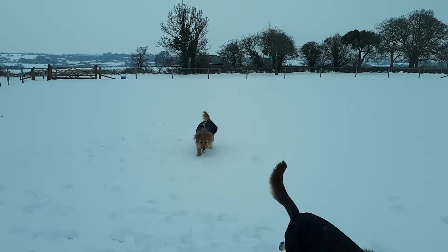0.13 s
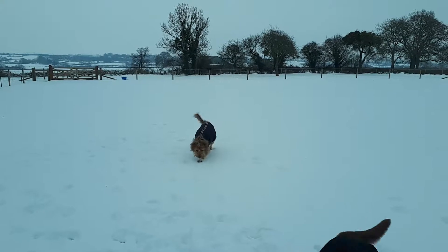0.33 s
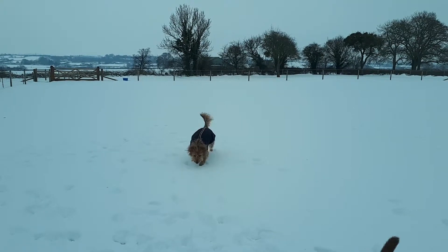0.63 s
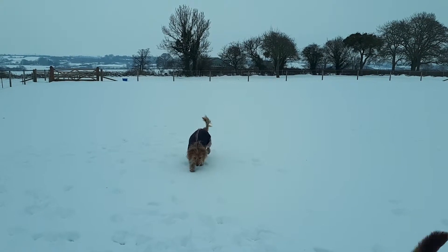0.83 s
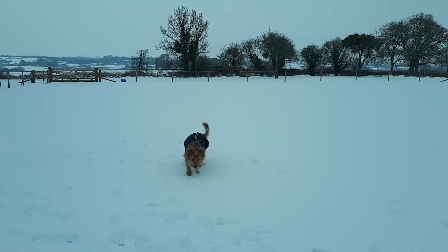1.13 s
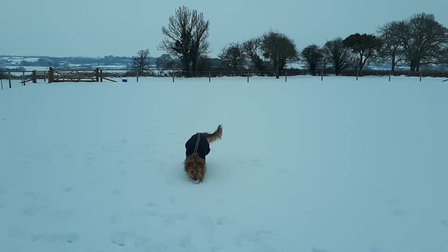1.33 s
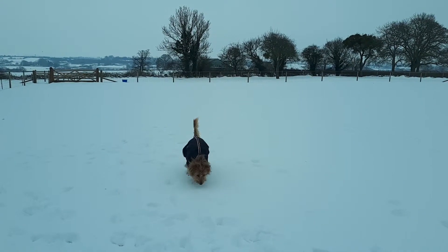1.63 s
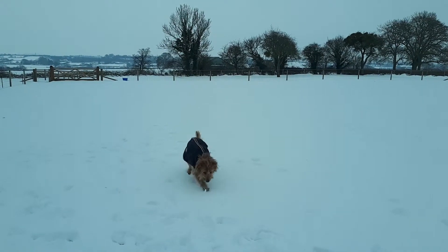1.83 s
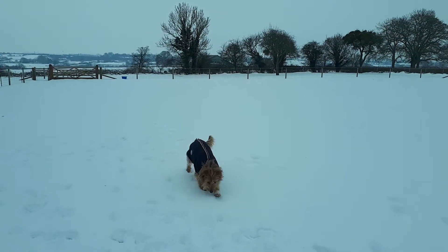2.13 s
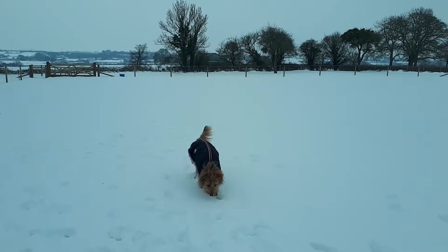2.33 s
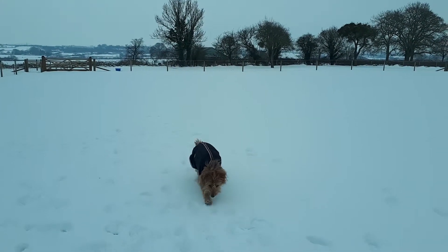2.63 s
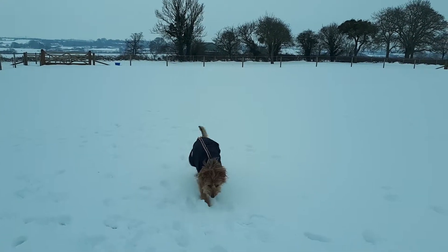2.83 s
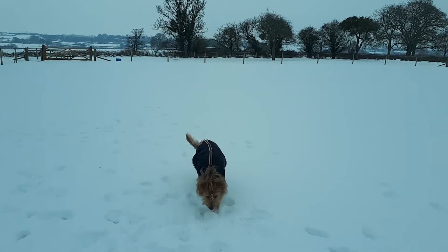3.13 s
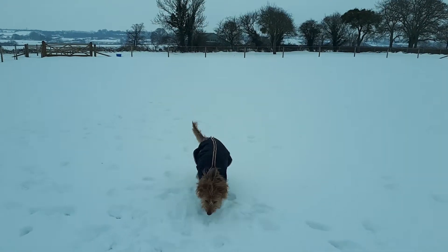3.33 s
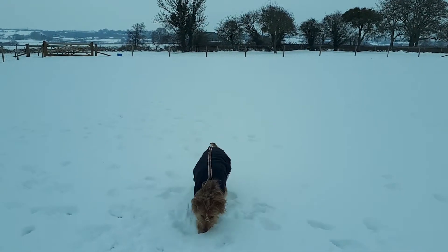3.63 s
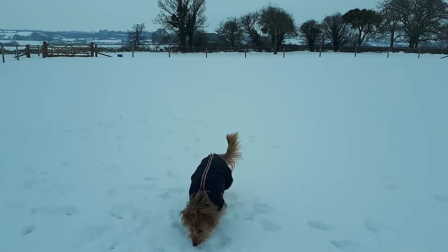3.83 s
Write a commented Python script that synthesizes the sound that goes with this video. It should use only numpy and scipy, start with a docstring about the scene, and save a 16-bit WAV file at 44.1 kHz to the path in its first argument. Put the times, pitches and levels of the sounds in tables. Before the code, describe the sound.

Close, dry crunching of dogs trotting on icy snow, brittle cracks between steps, soft distant air beneath; after nearly three seconds wind buffets and knocks the microphone, mostly on the left, far louder than the paws.

```python
"""In an open field of crusted snow, dogs walk close to a hand-held stereo microphone.
Each paw sets off a shower of tiny random ticks, filtered into thud, crush, rasp, ice and powder.
Single plates of ice snap as damped rings, and loose crumbs tick between the steps.
Late on, filtered noise and short knocks make wind that rumbles, buffets and slaps the two ports
until a limiter turns it down; a soft wash of far air lies underneath."""
import sys
import numpy as np
from scipy import signal
from scipy.fft import rfft, irfft
from scipy.io import wavfile
from scipy.ndimage import uniform_filter1d, minimum_filter1d

SR = 44100
rng = np.random.default_rng(int(sys.argv[2]) if len(sys.argv) > 2 else 0)


def generate_wav(sig):
    """Save sig (samples, or channels by samples) to the path in sys.argv[1] as 16-bit PCM at SR."""
    pcm = np.round(np.clip(np.atleast_2d(sig).T, -1, 1) * 32767).astype(np.int16)
    wavfile.write(sys.argv[1], SR, pcm)


N = 176400
TIME = np.arange(N) / SR

# The paws are nearer the right port: head start there, its random spread, and left-port gain
RIGHT_LEAD_S, LEAD_SCATTER_S, LEFT_GAIN_DB = 0.00028, 0.00004, -0.54

# Paws pressing into the snow: [t/s, length/s, then level/dB of thud, crush, rasp, ice, powder],
# the levels before a common 1 dB cut
PAW_STEPS = [(0.075, 0.022, -40, -39.5, -57, -41, -40.5), (0.105, 0.053, -43, -44, -51.5, -45, -47.5),
             (0.369, 0.095, -41, -38.5, -42, -39, -49), (0.484, 0.057, -48.5, -45.5, -63, -50.5, -55.5),
             (0.716, 0.02, -34, -46.5, -45.5, -52, -51), (0.747, 0.07, -50, -42, -38, -48, -45.5),
             (0.826, 0.066, -40.5, -52, -49.5, -49.5, -57), (0.942, 0.055, -47.5, -48.5, -55, -54, -65),
             (1.103, 0.074, -66, -44, -56, -48, -59), (1.2, 0.22, -50.5, -51.5, -53, -58, -61.5),
             (1.59, 0.083, -44.5, -44, -47.5, -51, -59.5), (1.722, 0.04, -42, -49.5, -48, -56, -55),
             (1.757, 0.097, -77, -46, -42, -48, -54.5), (1.996, 0.055, -52, -49, -50, -45, -53),
             (2.043, 0.053, -45, -46, -56, -64, -61), (2.515, 0.21, -45, -51, -70, -70, -69.5)]
# Tone of a fracture in each part of the snow, in the order of the level columns above:
# one list per part, each of [f/Hz, relative level/dB]
SNOW_PARTS = [
    [(70, -10), (125, 0.5), (220, -13.5), (380, -7), (700, -30), (2000, -85)],
    [(150, -10.5), (420, 4), (750, 4.5), (1300, 2.5), (2000, 0.5), (4000, -52)],
    [(1200, -3.5), (2300, 1.5), (3100, 2), (3900, -2), (6000, -20)],
    [(2500, -48), (4700, 3.5), (5800, -4), (7300, 3), (8400, -8), (15000, -32)],
    [(6000, -41), (9000, -6), (12000, 4.5), (15500, -1)],
]
FRACTURES_PER_S, SIZE_SPREAD_DB = 2600, 4.5
CLUMP_DB, CLUMP_RATE_HZ = 3, 187   # depth and speed of the wander that bunches fractures


def paws():
    """Snow under a paw breaks in one clumped stream of fractures, heard in all parts of the snow."""
    born = rng.random(N) < FRACTURES_PER_S / SR
    clumps = rms_one(from_db(CLUMP_DB * drift(CLUMP_RATE_HZ)))
    presses = np.array([press(start, length, thud_db, rasp_db)
                        for start, length, thud_db, _, rasp_db, *_ in PAW_STEPS])
    out = 0
    for spectrum, levels_db in zip(SNOW_PARTS, np.transpose(PAW_STEPS)[2:]):
        crackle = even(fractures(born, SIZE_SPREAD_DB, spectrum) * clumps, 0.0277)
        pressure = from_db(levels_db - 1) @ presses   # all steps added together
        out = out + crackle * pressure
    return signal.sosfilt(signal.butter(2, 50, "high", fs=SR, output="sos"), out)


ATTACK_S, RELEASE_S, SAG_DB = 0.0013, 0.0078, 4   # shortest rise, fall, loss during the hold
BITE_SHARE, BITE_S = 0.47, 0.015   # extra force as a paw first breaks through


def press(start, length, thud_db, rasp_db):
    """A paw that lands hard bites at once; one that mostly slides swells slowly."""
    slowdown = from_db(2 * max(rasp_db - thud_db, 0))
    rise = min(ATTACK_S * slowdown, length / 2)
    bite = 1 + BITE_SHARE * np.exp(-np.abs(TIME - start) / BITE_S)
    return bite * envelope(start, length, rise, RELEASE_S, SAG_DB)


GRAIN_Q = 3.17   # how briefly a single fracture rings
PATCHY_DB = 4.5   # fractures of each pitch come and go on their own


def fractures(born, spread_db, spectrum):
    """Each tick has its own size and one of ten pitches, and reaches the right port a little early."""
    at = np.flatnonzero(born)
    loudness = from_db(spread_db * np.minimum(rng.exponential(1, N), 4))
    size = (loudness * rng.choice([-1, 1], N))[at]   # push or pull at random
    lag_s = RIGHT_LEAD_S + LEAD_SCATTER_S * rng.standard_normal(N)[at]
    lag = np.rint(SR * lag_s).astype(int)
    pitch_number = rng.integers(0, 10, N)[at]
    out = 0
    for k, hz in enumerate(np.geomspace(spectrum[0][0], spectrum[-1][0], 10)):
        chosen = size * (pitch_number == k)
        clicks = np.array([np.bincount(port % N, chosen, N) for port in (at + lag, at)])
        b, a = signal.iirpeak(hz, GRAIN_Q, fs=SR)
        rings = signal.lfilter(b, a, clicks + 1e-18)
        out = out + from_db(PATCHY_DB * drift(CLUMP_RATE_HZ / 2)) * rings
    return colour(out, spectrum)


# Single plates of crust snapping: [t/s, peak level/dB before the crust's scatter, f/Hz]
ICE_SNAPS = [(.122, -24, 4750), (0.273, -25.5, 1450), (.314, -22, 8400), (.347, -28, 12000),
             (0.4842, -15, 6800), (.522, -23.5, 6500), (.715, -22, 3470), (1.030, -22.5, 1710),
             (1.116, -21.5, 1180), (1.1257, -13.5, 4800), (1.1487, -18, 1240), (1.271, -19.5, 3360),
             (1.593, -24, 1950), (1.747, -19.5, 6740), (1.815, -21, 3470), (1.859, -30, 3400),
             (2.005, -16, 7300), (2.373, -26.5, 2900), (2.515, -30, 7250), (2.753, -16.5, 6950),
             (2.784, -27, 4800), (3.072, -19.5, 6140), (3.9155, -31, 6600)]
SNAP_Q = 1.82   # low, so the ring dies almost at once
SPLINTER_DB, SPLINTER_S = -27, 0.0028   # spray against the first push, and its fading time


def snaps():
    """A plate breaks with one heavily damped ring and a brief spray of splinters."""
    out, t = np.zeros(N + SR), TIME[:SR // 30]
    for start, db, hz in ICE_SNAPS:
        push = from_db(SPLINTER_DB) * rng.standard_normal(len(t)) * np.exp(-t / SPLINTER_S)
        push[0] = 1   # the break itself
        softened = signal.lfilter(*signal.butter(2, 9000, fs=SR), push)
        b, a = signal.iirpeak(min(hz, SR / 3), SNAP_Q, fs=SR)
        ring = signal.lfilter(b, a, softened)
        i = int(start * SR)
        out[i:i + len(t)] += from_db(db) * ring / np.abs(ring).max()
    left = np.roll(out, int(RIGHT_LEAD_S * SR))[:N]
    return np.array([left, out[:N]])


# Loose ice crumbs shifting under the dogs: [t/s, level/dB]
CRUMB_LEVEL = [(0, -49), (.23, -53), (.5, -51), (1.35, -50.5), (1.56, -61.5), (1.95, -47), (2.42, -55),
               (3.42, -53), (3.72, -66.5), (4, -53)]
# Tone of the crumbs: [f/Hz, relative level/dB]
CRUMB_TONE = [(300, -9.5), (1000, 5), (3200, -3.5), (5600, -3.5), (7200, 4.5), (8600, -12.5),
              (15000, -13.5)]
CRUMBS_PER_S, CRUMB_SPREAD_DB = 2200, 3.5


def crumbs():
    """Loose ice ticks between the steps, each crumb a tiny fracture."""
    born = rng.random(N) < CRUMBS_PER_S / SR
    ticking = fractures(born, CRUMB_SPREAD_DB, CRUMB_TONE) * from_db(2 * drift(16))
    return level(CRUMB_LEVEL) * even(ticking, 0.6)


SCATTER_DB, SCATTER_S = -4, 0.0022   # strength before the treble filter; rise and fading time


def off_the_crust(x):
    """Sound glancing off the rough crust adds a few milliseconds of scattered treble."""
    t = TIME[:SR // 50]
    tail = rng.standard_normal((2, len(t))) * np.exp(-t / SCATTER_S) * np.minimum(t / SCATTER_S, 1)
    tail = tail / np.linalg.norm(tail, axis=1, keepdims=True)
    tail = signal.sosfilt(signal.butter(1, 1500, "high", fs=SR, output="sos"), tail)
    scattered = signal.fftconvolve(x, tail, axes=1)[:, :N]
    port_gain = from_db([[LEFT_GAIN_DB], [-LEFT_GAIN_DB]])
    return (x + from_db(SCATTER_DB) * scattered) * port_gain


# Wind rumble at each port: [t/s, level/dB]
RUMBLE_LEFT = [(2.4, -63.5), (2.88, -28), (2.95, -18), (3.10, -14.5), (3.115, -19.5), (3.46, -18.5),
               (3.57, -24.5), (3.665, -27.5), (3.695, -14), (3.72, -26), (3.79, -22), (3.825, -17),
               (3.945, -12), (3.96, -26.5)]
RUMBLE_RIGHT = [(2.4, -63), (2.86, -38.5), (2.975, -17.5), (3.02, -38), (3.25, -20), (3.39, -15),
                (3.44, -26), (4, -41)]
# Tone of the rumble: [f/Hz, relative level/dB]
RUMBLE_TONE = [(45, -27.5), (70, -3), (130, 1.5), (210, -6.5), (500, -25.5), (2500, -66.5)]
# Eddies striking one port: [t/s, length/s, level/dB, roll-off f/Hz, port]
EDDIES = [(2.925, 0.036, -5.5, 755, "left"), (2.968, 0.042, -8.5, 866, "left"),
          (3.027, .019, 6, 920, "left"), (3.075, 0.024, -7, 720, "left"), (3.227, 0.083, -15, 800, "right"),
          (3.336, 0.067, -17, 750, "right"), (3.83, 0.025, -9, 720, "left"),
          (3.867, 0.054, -6.5, 760, "left"), (3.923, 0.023, -11.5, 473, "left")]
# Tone of the eddies before their roll-off: [f/Hz, relative level/dB]
EDDY_TONE = [(50, -14), (125, 6.5), (220, 2), (450, -2.5), (1000, -16), (3000, -15.5)]
BUFFET_RISE_S, BUFFET_FALL_S, WIND_EVEN_S = 0.0033, 0.0038, 0.0162


def wind():
    """Each port has its own rumble; an eddy that hits it adds a short, rough flutter."""
    rumble = even(colour(rng.standard_normal((2, N)), RUMBLE_TONE), WIND_EVEN_S)
    out = rumble * [level(RUMBLE_LEFT), level(RUMBLE_RIGHT)]
    turbulence = colour(rng.standard_normal(N) * from_db(2 * drift(150)), EDDY_TONE)
    for start, length, db, hz, port in EDDIES:
        dulled = signal.sosfilt(signal.butter(4, hz, fs=SR, output="sos"), turbulence)
        flutter = even(dulled, WIND_EVEN_S)
        buffet = flutter * envelope(start, length, BUFFET_RISE_S, BUFFET_FALL_S)
        out[int(port == "right")] += from_db(db) * buffet
    return out


# Single hard slaps of air on one port: [t/s, peak level/dB of the knock alone, f/Hz, port]
AIR_SLAPS = [(2.795, -7.5, 160, "left"), (2.933, -5, 602, "left"), (2.974, -14.5, 870, "left"),
             (3.003, -10, 1030, "left"), (3.248, -14.5, 480, "right"), (3.379, -17, 497, "right"),
             (3.595, -9, 190, "right"), (3.855, -8.5, 722, "left"), (3.867, 2, 417, "left")]
PORT_HZ, PORT_RING_S, PORT_SHARE = 120, 0.014, 0.79   # the boom: pitch, fading time, size


def slaps():
    """A small, fast eddy knocks on one port: a kick of two or three cycles with a low boom."""
    out, t = np.zeros((2, N + SR)), TIME[:SR // 10]
    fade = np.exp(-t / PORT_RING_S) * np.minimum(t * PORT_HZ, 1)
    boom = PORT_SHARE * np.sin(2 * np.pi * PORT_HZ * t) * fade
    for start, db, hz, port in AIR_SLAPS:
        octave_band = [hz / np.sqrt(2), hz * np.sqrt(2)]
        kick = signal.unit_impulse(len(t))
        knock = signal.sosfilt(signal.butter(2, octave_band, "band", fs=SR, output="sos"), kick)
        knock = signal.sosfilt(signal.butter(2, 2 * hz, fs=SR, output="sos"), knock)
        i = int(start * SR)
        out[int(port == "right"), i:i + len(t)] += from_db(db) * (knock / np.abs(knock).max() + boom)
    return out[:, :N]


# Tone of the far air over the field: [f/Hz, relative level/dB]
AIR_TONE = [(150, -2.5), (620, 1.5), (1100, -11.5), (5000, -21), (8600, -35)]
AIR_DB, AIR_SIDE_DB, AIR_WANDER_DB = -50, -6.5, 2.5   # level, stereo width, swell


def air():
    """Soft wash from far across the field, swelling and sinking a little."""
    mid, side = rng.standard_normal((2, N))
    stereo = mid + from_db(AIR_SIDE_DB) * side * [[1], [-1]]
    return from_db(AIR_DB + AIR_WANDER_DB * drift(9.1)) * colour(stereo, AIR_TONE)


def from_db(db):
    """Turn decibels into a gain."""
    return 10 ** (np.asarray(db) / 20)


def rms_one(x):
    """Scale a sound to an average power of one."""
    return x / np.sqrt(np.mean(x ** 2) + 1e-20)


def level(curve):
    """Draw a gain over time through (t/s, level/dB) points."""
    return from_db(np.interp(TIME, *np.transpose(curve)))


def colour(x, points):
    """Shape the tone through (f/Hz, level/dB) points without sound before its cause; unit power."""
    hz, db = np.transpose(points)
    octave = np.log2(np.maximum(np.fft.rfftfreq(N, 1 / SR), 10))
    outside = np.abs(octave - np.clip(octave, np.log2(hz[0]), np.log2(hz[-1])))
    # past both end points the sound falls 12 dB per octave
    gain = from_db(np.interp(octave, np.log2(hz), db) - 12 * outside)
    # folding the cepstrum (the spectrum of the log gain) makes the filter minimum-phase
    cepstrum = irfft(np.log(gain), N)
    response = np.exp(rfft(2 * cepstrum[:N // 2], N) - cepstrum[0])
    return rms_one(irfft(rfft(x) * response, N))


def even(x, span_s):
    """Hold the power of a noise nearly steady over spans of this length."""
    power = np.abs(uniform_filter1d(x ** 2, max(int(span_s * SR), 2), axis=-1))
    return x / np.sqrt(power + 1e-4)


def drift(rate_hz):
    """Make a slow random wander, noise smoothed twice, with a spread of one."""
    r = np.exp(-2 * np.pi * rate_hz / SR)
    return rms_one(signal.lfilter([1], [1, -2 * r, r * r], rng.standard_normal(N)))


def envelope(start, length, rise, fall, sag_db=0):
    """Rise in a straight line, sag during the hold, then die away; half a second at most."""
    out, i = np.zeros(N), max(int(start * SR), 0)
    t = TIME[:min(N - i, SR // 2)]
    attack = np.minimum(t / rise, 1)
    sag = from_db(sag_db * (1.0 - np.minimum(t / length, 1)))
    release = np.exp(-np.maximum(t - length, 0) / fall)
    out[i:i + len(t)] = attack * sag * release
    return out


def scene():
    """Add the snow sounds, the wind on the microphone and the distant air."""
    snow = off_the_crust(paws() + snaps() + crumbs())
    return snow + wind() + slaps() + air()


LIMIT, CUTOFF_HZ = 0.93, 16100   # limiter threshold (full scale is 1), top of the treble


def record(dry):
    """A limiter in each channel ducks the strongest peaks; the top is cut."""
    hold = SR // 100   # 10 ms
    gain = minimum_filter1d(np.minimum(1, LIMIT / (np.abs(dry) + 1e-9)), hold, axis=-1)
    limited = dry * uniform_filter1d(gain, hold, axis=-1)
    return signal.sosfilt(signal.ellip(10, 0.2, 80, CUTOFF_HZ, fs=SR, output="sos"), limited)


dry = scene()
out = record(dry)
generate_wav(out)
```